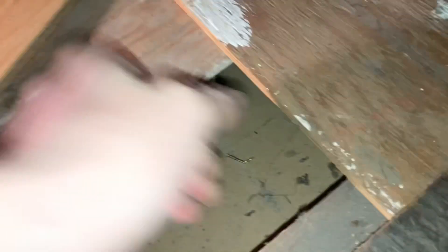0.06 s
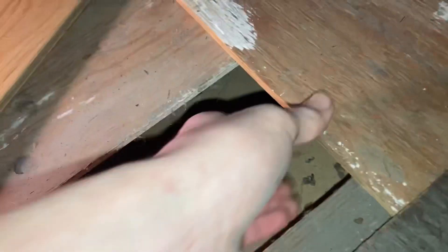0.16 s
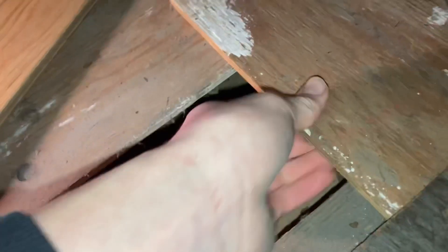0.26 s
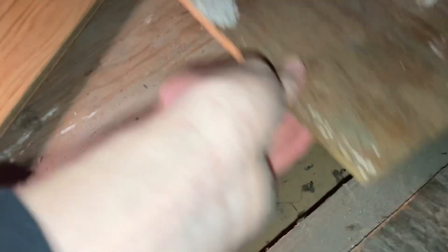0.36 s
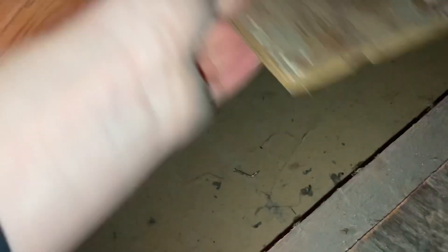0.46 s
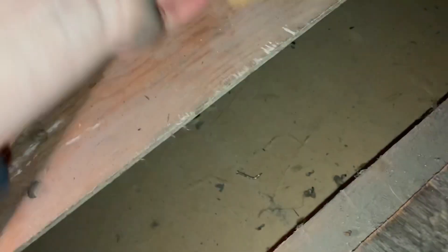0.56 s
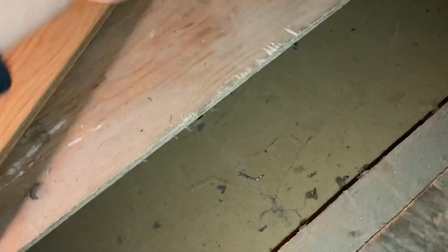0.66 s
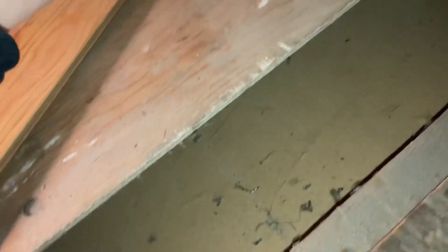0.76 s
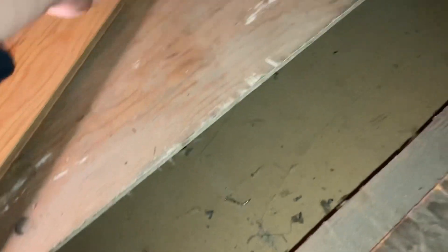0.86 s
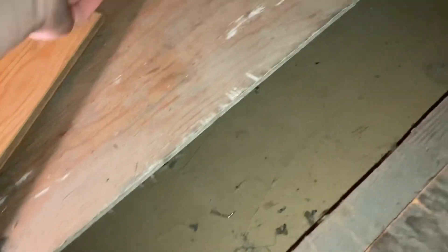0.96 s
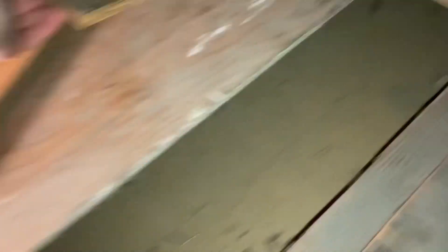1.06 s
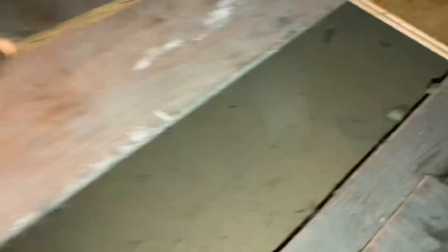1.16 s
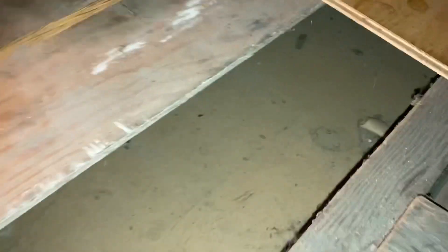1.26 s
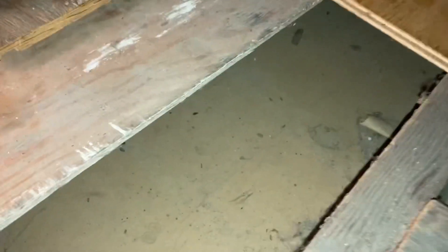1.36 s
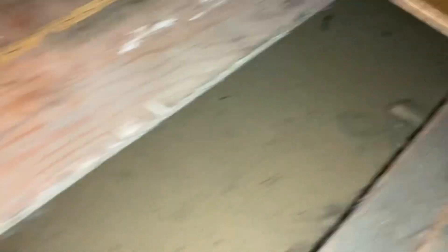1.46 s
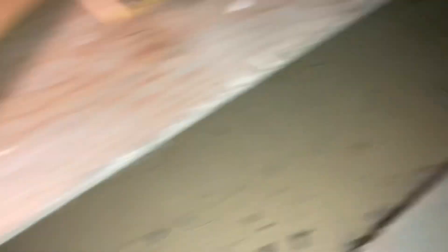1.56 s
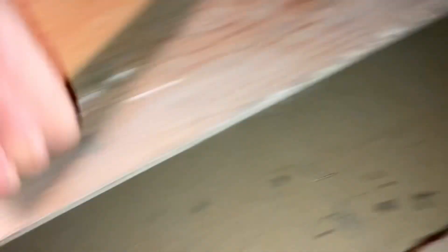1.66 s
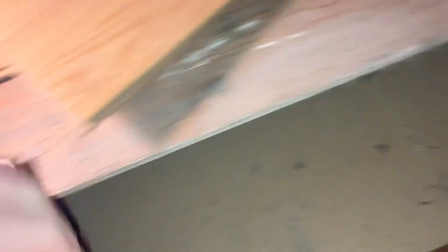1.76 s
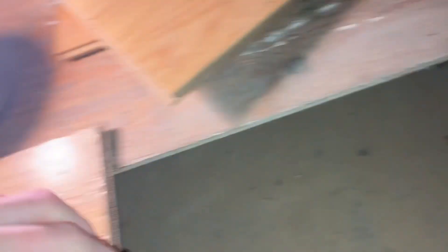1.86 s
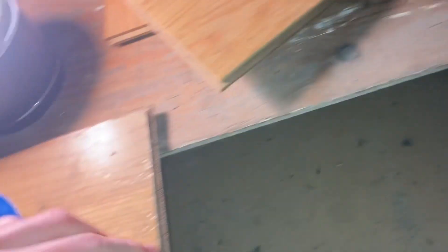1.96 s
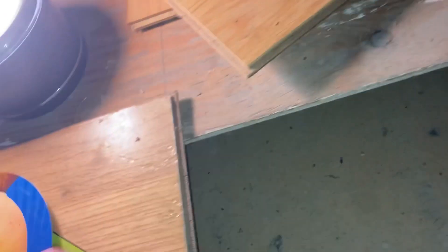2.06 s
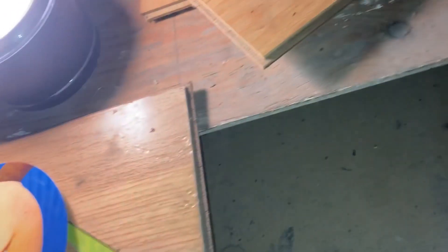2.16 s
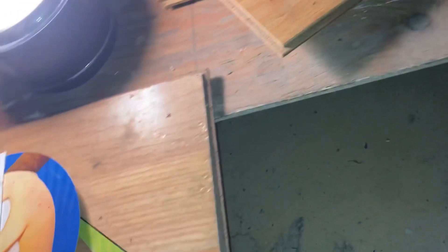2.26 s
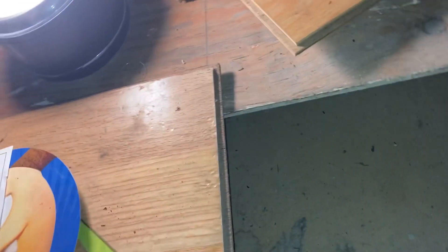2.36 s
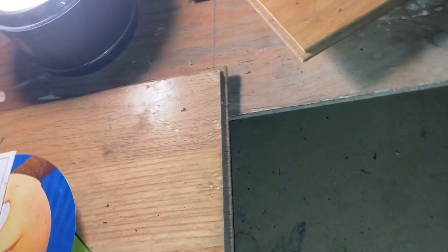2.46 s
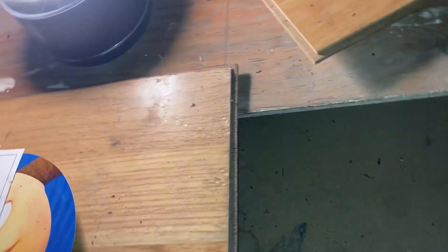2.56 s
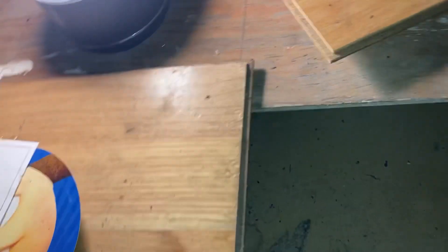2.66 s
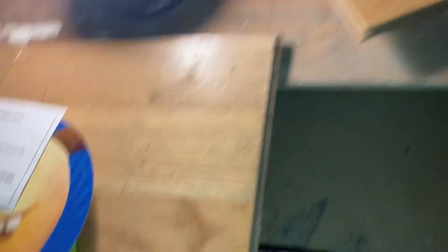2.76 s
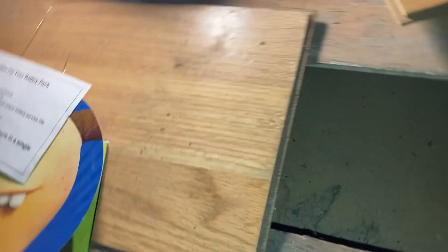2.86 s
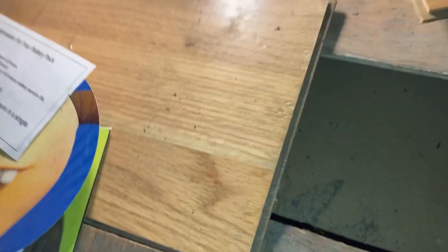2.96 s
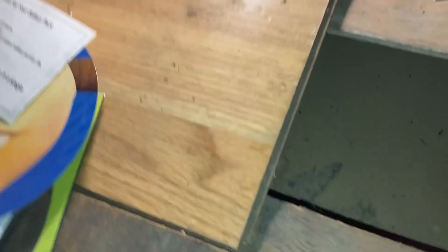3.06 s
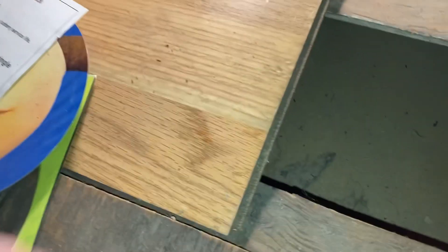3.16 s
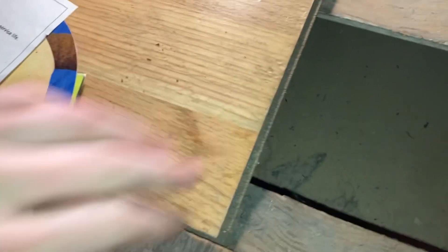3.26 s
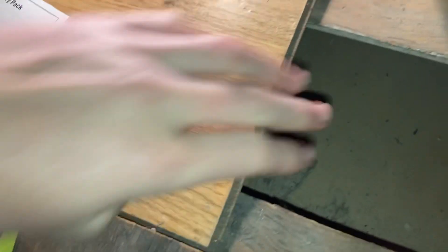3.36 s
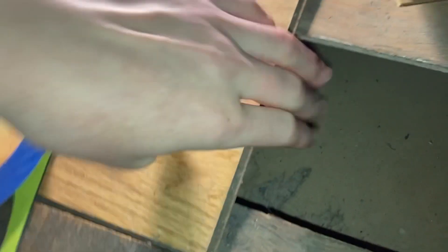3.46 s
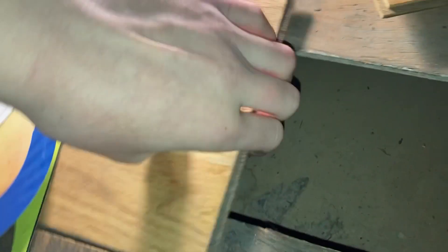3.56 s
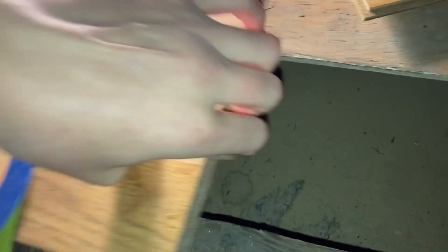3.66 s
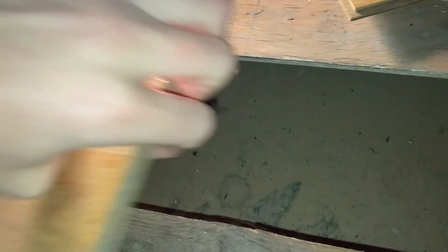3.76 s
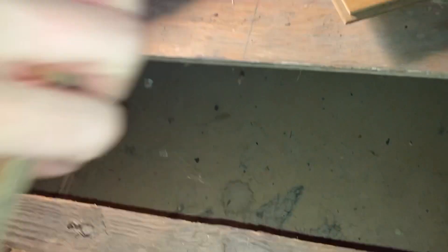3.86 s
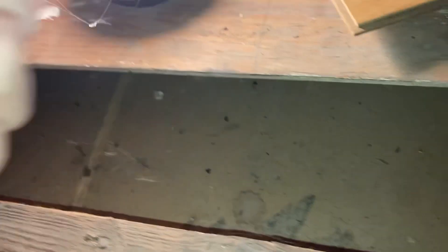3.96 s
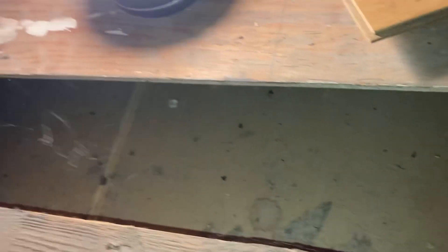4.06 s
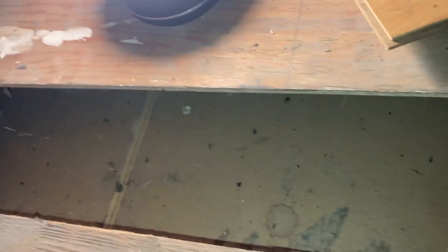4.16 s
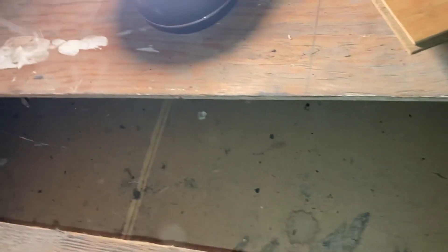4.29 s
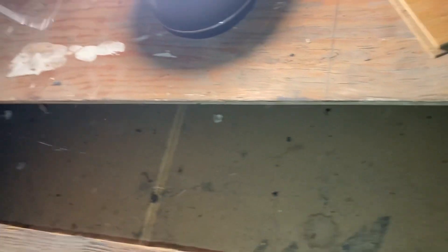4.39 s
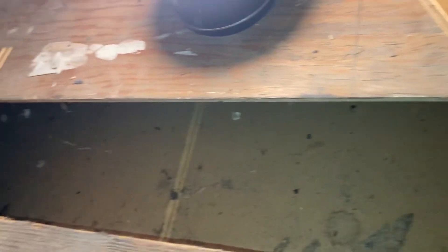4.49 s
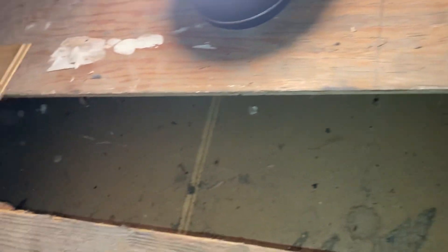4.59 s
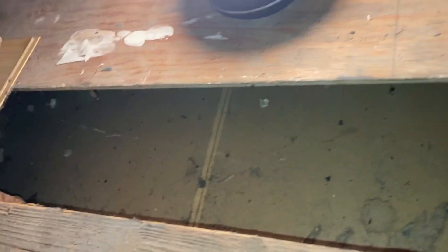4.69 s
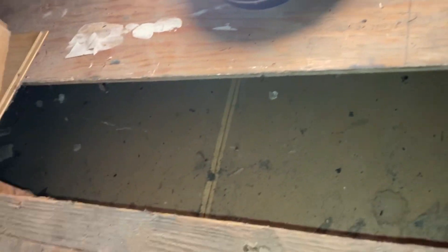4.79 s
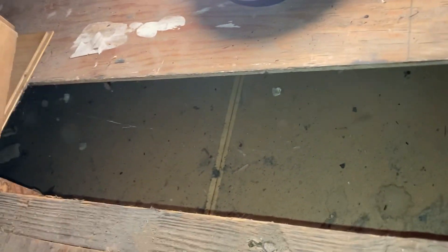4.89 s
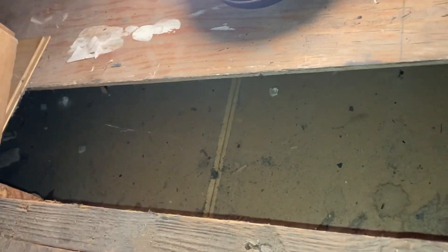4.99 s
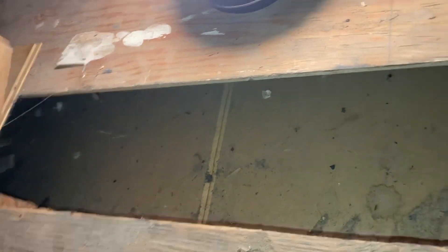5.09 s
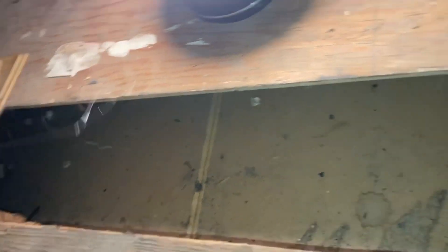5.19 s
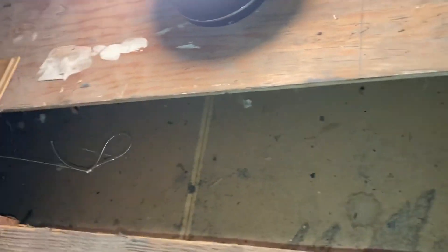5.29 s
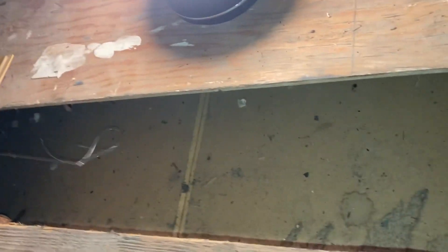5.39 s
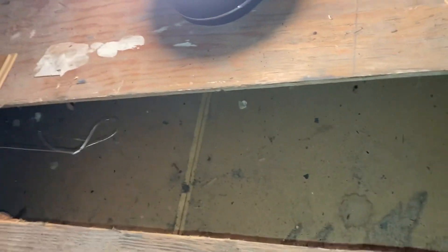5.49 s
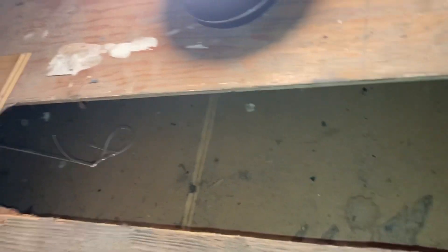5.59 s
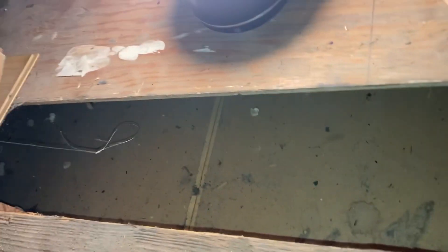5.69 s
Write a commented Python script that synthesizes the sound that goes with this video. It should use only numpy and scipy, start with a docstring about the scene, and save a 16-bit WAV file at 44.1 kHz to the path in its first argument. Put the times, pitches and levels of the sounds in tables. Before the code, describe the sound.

Wood on wood, very near the microphone: light thumps and a brief rub, one hard clack just before a second, a bouncing clatter soon after. Next a board grates over dusty timber in two rough strokes, with ticks and crackles of grit and a dull knock between them. The small wooden space adds short reflections over quiet air noise.

```python
"""Loose boards dragged and dropped in an attic

Plywood boards on joists are nudged and dragged, and one drops twice with bounces. A palm thumps them.
Blows are sums of fading tones; rubbing is dense random clicks sent through resonances, with hissing dust.
Grit catches as short noise bursts, edges squeal in narrow resonances, and the floor booms as low noise.
Faint hum and air noise run throughout, and short reflections off the rafters surround the boards.
"""
import sys
import numpy as np
from scipy import signal
from scipy.fft import rfft, irfft
from scipy.io import wavfile
from scipy.ndimage import uniform_filter1d, map_coordinates

SR = 44100
rng = np.random.default_rng(int(sys.argv[2]) if len(sys.argv) > 2 else 0)


def put_to_file(sound):
    """Save the sound as 16-bit audio at rate SR, in the file named by the first command-line argument."""
    columns = np.atleast_2d(sound).T  # one column per channel
    safe = np.clip(columns, -1, 1)
    whole_steps = np.round(safe * 32767)
    wavfile.write(sys.argv[1], SR, whole_steps.astype(np.int16))


N = 252693


def from_db(db):
    """Turns decibels into a plain multiplier."""
    return 10 ** (np.asarray(db) / 20)


def rms_one(x):
    """Scales a sound to an average (rms) strength of 1."""
    return x / np.sqrt(np.mean(x ** 2) + 1e-20)


def butter(x, hz, kind, order=2):
    """Keeps only the low, high or middle band of a sound."""
    return signal.sosfilt(signal.butter(order, hz, kind, fs=SR, output="sos"), x)


def at_hz(points, hz):
    """Reads a curve of (pitch, value) points, with pitch on a logarithmic scale."""
    point_hz, values = np.array(points).T
    return np.interp(np.log(hz), np.log(point_hz), values)


def coloured(x, spectrum):
    """Shapes a steady sound by a curve of (frequency [Hz], level [dB])."""
    hz = np.maximum(np.fft.rfftfreq(N, 1 / SR), 1)
    return irfft(rfft(x) * from_db(at_hz(spectrum, hz)), N)


def delayed(x, lag_s):
    """Delays a sound, even by part of a sample, by turning the phase of each frequency."""
    hz = np.fft.rfftfreq(N, 1 / SR)
    return irfft(rfft(x) * np.exp(-2j * np.pi * hz * lag_s), N)


def lumps(per_s):
    """Slow random ups and downs with rms 1, no faster than about per_s [Hz]."""
    return rms_one(butter(rng.standard_normal(N), per_s, "low"))


def resonances(x, peaks, patchy_db=0):
    """Side-by-side resonances with alternating signs, which can swell and fade one by one; rms 1."""
    out = 0
    for k, (hz, width, level_db) in enumerate(peaks):
        r = np.exp(-np.pi * width / SR)
        feedback = [1, -2 * r * np.cos(2 * np.pi * hz / SR), r * r]
        ringing = signal.lfilter([(1 - r * r) / 2, 0, (r * r - 1) / 2], feedback, x)
        # the contact moves, so each resonance comes and goes
        swell_db = patchy_db * lumps(30) if patchy_db else 0
        out = out + (-1) ** k * from_db(level_db + swell_db) * ringing
    return rms_one(out)


def grit(per_s, spread_db):
    """Random tiny collisions, per_s of them a second on average; spread_db makes them uneven; rms 1."""
    sizes = from_db(spread_db * np.minimum(rng.exponential(1, N), 4))
    signs = rng.choice([-1, 1], N)
    hits = rng.random(N) < per_s / SR
    return rms_one(sizes * signs * hits)


def add(out, x, s):
    """Mixes a short sound into a longer one, starting at s seconds."""
    at = round(s * SR)
    out[..., at:at + x.shape[-1]] += x[..., :N - at]


def dying(events, rise_s, t60):
    """Volume curve that swells at each event (time [s], level [dB]) and falls 60 dB in t60 seconds."""
    t = np.arange(N) / SR
    power = 0
    for s, level_db in events:
        after = np.maximum(t - s, 0)
        power = power + (from_db(level_db - 60 * after / t60) * (1 - np.exp(-after / rise_s))) ** 2
    return np.sqrt(power)


def air():
    """Steady low hum, the same on both sides, and a hush of noise that is more alike in the bass."""
    # colour of the hush: (frequency [Hz], relative level [dB per Hz])
    hush_colour = [(41, -6), (70, 5.5), (155, -1.5), (393, -13.5), (632, -9.5), (1290, -9.5), (1880, -16),
                   (2740, -22.5), (4330, -32), (5380, -72), (8000, -107), (10400, -80), (17600, -120)]
    # how alike left and right are: (frequency [Hz], likeness [0 to 1])
    likeness = [(30, 0.21), (130, 0.69), (300, 0.83), (700, 0.66), (1500, 0.2), (4000, 0.037)]
    # hum resonance: (frequency [Hz], width [Hz], relative level [dB])
    hum_peak = [(48.8, 2.55, 0)]
    hum_db, hush_db = -45, -50.5
    mid, side = rng.standard_normal((2, N))
    # the shared part is strong where the sides are alike, the opposed part where they differ
    side = coloured(side, [(hz, 10 * np.log10(1 - c)) for hz, c in likeness])
    mid = coloured(mid, [(hz, 10 * np.log10(1 + c)) for hz, c in likeness])
    hum = from_db(hum_db) * resonances(rng.standard_normal(N), hum_peak)
    hush = rms_one(np.array([coloured(mid + side, hush_colour), coloured(mid - side, hush_colour)]))
    return hum + from_db(hush_db) * hush


def stroke_levels():
    """Loudness of rubbing and of dust over time, in dB: the louder stroke wins where strokes meet."""
    # strokes of wood over wood, one curve each: (time [s], rubbing level [dB], dust hiss level [dB])
    strokes = [
        [(0.0, -81, -62), (0.1, -56.5, -68), (0.245, -54, -65), (0.258, -45.5, -51), (0.27, -57, -52),
         (0.32, -50, -64), (0.34, -48, -43), (0.36, -41, -39), (0.385, -39.5, -42), (0.43, -63, -76),
         (0.55, -90, -99), (0.8, -57, -77)],
        [(0.9, -86, -86), (0.94, -54, -56), (1.01, -70, -80), (1.05, -59, -72), (1.15, -49.5, -52.5),
         (1.24, -52, -51), (1.275, -36, -69)],
        [(1.47, -56.5, -73), (1.56, -55.5, -62), (1.68, -53.5, -55), (1.88, -61.5, -83)],
        [(1.96, -52.5, -81), (2.03, -78, -49), (2.1, -70, -48.5), (2.17, -56, -42), (2.22, -50, -39.5),
         (2.35, -48, -44), (2.41, -51, -36.5), (2.65, -44.5, -35.5), (2.81, -36, -30.5), (2.87, -35.5, -38),
         (2.895, -36, -37), (2.92, -41.5, -40), (2.96, -49, -49), (2.99, -57, -53)],
        [(2.99, -47, -48), (3.015, -46, -45), (3.03, -41, -37), (3.06, -38.5, -39.5), (3.13, -38.5, -56),
         (3.21, -51.5, -64), (3.38, -51, -69), (3.5, -53, -67)],
        [(3.51, -55, -59), (3.56, -41, -53), (3.6, -50.5, -53.5), (3.77, -42.5, -41.5), (3.89, -40.5, -40),
         (4.01, -38, -37.5), (4.045, -32, -37), (4.07, -36, -36), (4.1, -40, -41), (4.18, -41, -45),
         (4.28, -39, -34), (4.32, -40, -42), (4.47, -37.5, -39.5), (4.6, -37, -36.5), (4.64, -50.5, -55),
         (4.72, -51, -59)],
        [(4.73, -57, -61), (4.76, -51.5, -51), (4.84, -55, -79), (4.93, -53.5, -63), (4.96, -52.5, -85),
         (5.02, -50.5, -51), (5.12, -55.5, -77), (5.36, -51.5, -62.5), (5.49, -54, -75), (5.73, -53, -66)],
    ]
    t, silent_db = np.arange(N) / SR, -120
    rub_curves, hiss_curves = [], []
    for rows in strokes:
        times, rub, hiss = np.transpose(rows)
        rub_curves.append(np.interp(t, times, rub, silent_db, silent_db))
        hiss_curves.append(np.interp(t, times, hiss, silent_db, silent_db))
    return np.max(rub_curves, axis=0), np.max(hiss_curves, axis=0)


def floor_boom(rub_db):
    """Weight landing on the joists, and rubbing above them, set off low resonances of the floor."""
    # joists and floor: (frequency [Hz], width [Hz], relative level [dB])
    floor_peaks = [(58.2, 16.2, 3), (82.3, 22.4, 0.5), (116.7, 21.7, -7)]
    # weight landing on the floor: (time [s], level [dB])
    loads = [(0.0, -27), (0.265, -23.5), (0.37, -27), (0.825, -13), (0.87, -40), (0.94, -32), (1.02, -27.5),
             (1.1, -31), (1.2, -35), (1.29, -16), (1.51, -30.5), (3.11, -38), (3.54, -28), (3.6, -28.5),
             (4.09, -49), (4.26, -37), (4.58, -43), (4.75, -46), (4.92, -43), (5.1, -52)]
    swing = butter(resonances(rng.standard_normal(N), floor_peaks), 56, "high", order=3)
    # under a stroke, the boom's drive is 11 dB below the rubbing
    boom = dying(loads, rise_s=0.0025, t60=0.45) + from_db(rub_db - 11)
    # the joists swing evenly once they are loaded
    swing_size = np.sqrt(uniform_filter1d(swing ** 2, size=SR // 25) + 0.076)
    return boom * swing / swing_size


def rubbed_wood(rub_db, uneven):
    """Dense grit excites the dragged board's body and a scratchy rasp; drops rattle on the joists."""
    # dragged board's body: (frequency [Hz], width [Hz], relative level [dB])
    body_peaks = [(173, 37, 3.5), (308, 131, 3.5), (486, 490, -15.5), (638, 193, 3.5), (1340, 410, -1)]
    # scratchy rasp: (frequency [Hz], width [Hz], relative level [dB])
    rasp_peaks = [(1230, 570, -4), (2020, 490, 0), (2530, 1200, -2.5), (3100, 530, -2), (3630, 730, -7),
                  (4470, 480, 0), (5220, 640, -8.5)]
    # a dropped board rattles on the joists: (time [s], level [dB])
    rattle_events = [(0.822, -28), (0.858, -20.5), (1.277, -15), (1.292, -18), (1.319, -15), (1.35, -33.5)]
    patchy_db = 1.5
    faint_db, faint_dull_hz = -50, 2700   # rubbing below this level loses its edge
    rattle = dying(rattle_events, rise_s=0.00096, t60=0.093)
    # the body is at -42.5 dB when the rubbing is at -41 dB, and follows nearly all of its swing
    body = from_db(-42.5 + 0.98 * (rub_db + 41)) * uneven ** 0.67 + rattle
    rasp = from_db(rub_db) * uneven
    clatter = from_db(-1.0) * rattle ** 2 / rattle.max()   # squared, so it fades faster than the rattle
    edge = 1 / (1 + from_db(faint_db - rub_db))
    grating = resonances(grit(9000, spread_db=1.8), rasp_peaks, patchy_db)
    dull = butter(grating, faint_dull_hz, "low")
    body_sound = body * resonances(grit(4000, spread_db=1.0), body_peaks, patchy_db)
    rasp_sound = rasp * (dull + edge * (grating - dull))
    return body_sound + rasp_sound + clatter * dull


def dust_hiss(hiss_db, uneven):
    """Dust under the board hisses: equal tiny collisions, shaped by a steady colour."""
    # colour of the hiss: (frequency [Hz], relative level [dB per Hz])
    hiss_colour = [(4000, -5.5), (6000, -8), (8000, -3), (11000, -4.5), (13500, -4.5), (15500, -14),
                   (15950, 10), (16250, -29)]
    hiss = rms_one(coloured(grit(8000, spread_db=0.0), hiss_colour))
    return from_db(hiss_db) * uneven ** 0.56 * hiss


def drag():
    """Wood, dust and floor all follow the same strokes; the grain makes the wood and dust uneven."""
    rub_db, hiss_db = stroke_levels()
    uneven = from_db(1.8 * lumps(25))
    return rubbed_wood(rub_db, uneven), dust_hiss(hiss_db, uneven), floor_boom(rub_db)


def knocks():
    """A short chatter of contact sets the board ringing; hard blows favour high modes, a crack tops them."""
    # blows on the boards: (time [s], level [dB], hardness: tilt above 250 Hz [dB per octave],
    # thud: boost of modes below 220 Hz [dB], share of the free ringing time [0 to 1])
    blow_rows = [(0.108, -41, -8, 2, 0.48), (0.268, -19.5, -6, 5, 0.22), (0.283, -20.5, -9, 1, 0.32),
                 (0.318, -25, -14, 15, 0.47), (0.351, -28, 5.5, 22, 1), (0.378, -25.5, -24, -3, 0.41),
                 (0.433, -38, -26, 0, 0.39), (0.618, -42.5, 2.5, -23, 0.16), (0.824, 1.5, 7.5, -1, 0.19),
                 (0.838, -6, -0.5, 4, 0.47), (0.8572, -2, -2, -6, 0.39), (0.899, -18.5, 1, -11, 0.35),
                 (0.911, -17, -7, 6, 0.93), (0.959, -19.5, -13, 5.5, 0.96), (1.006, -24, -9, 10, 0.78),
                 (1.115, -29.5, -40, 1, 0.92), (1.277, -13, 2, -13, 0.22), (1.281, -8.5, 4.5, -5, 0.28),
                 (1.285, -7.5, 3, -14, 0.21), (1.29, -4.5, 3.5, -15, 0.48), (1.295, -2.5, -9, -6, 0.33),
                 (1.305, -14, 8, -14, 0.26), (1.311, -16.5, 8, -8, 0.27), (1.32, -8.5, 2, -20, 0.19),
                 (1.327, -8.5, 2, -6, 0.22), (1.335, -11, -9, -12, 0.21), (1.343, -15, 2, -26, 0.59),
                 (1.354, -12, -6.5, -21, 0.53), (1.366, -16, -10, -6, 0.39), (1.375, -22.5, 0.5, -12, 0.62),
                 (1.389, -20.5, -5, -4, 0.56), (1.414, -23, -14.5, 4, 0.6), (1.503, -33, -20, 9, 0.21),
                 (2.878, -34, 0, 11, 0.2), (3.032, -25, -3.5, -1, 0.18), (3.083, -25, -3.5, -10, 0.21),
                 (3.498, -35.5, -6, 12, 0.3), (3.538, -28, -2, -8, 0.31), (3.541, -19.5, -7.5, 0, 0.17),
                 (3.549, -27.5, -4.5, -2, 0.33), (3.557, -24.5, -21, -17, 0.29), (3.573, -29, 6, 28, 0.34),
                 (3.584, -46, 3, -2, 0.18), (3.611, -43, -5, 12, 0.67), (3.914, -23, -5.5, -8.5, 0.7),
                 (3.954, -26, 10, 4, 0.19), (4.226, -24, -15, -6, 0.14), (4.238, -29, -13, 28, 0.59),
                 (4.248, -39, 1, 2, 0.46), (4.262, -45, -9, 17, 0.85), (4.285, -43, -16, 22, 0.71),
                 (4.877, -41.5, -14, 5, 0.74), (4.979, -25.5, -2, -6.5, 0.22)]
    # ringing modes of a board: (frequency [Hz], relative level [dB], time to fall 60 dB when free [s])
    board_modes = [(116.8, -7.5, 0.86), (154.7, -4.5, 0.54), (202, -6.5, 0.27), (245.1, -4, 0.48),
                   (307.5, 3.5, 0.33), (349, 0.5, 0.25), (391, -1, 0.3), (420.3, -7.5, 0.54),
                   (488, -8, 0.44), (568, 9.5, 0.089), (610, -2.5, 0.24), (687.5, 1.5, 0.31),
                   (827.6, 9, 0.11), (954, 3, 0.095), (1066, 8, 0.14), (1132, -0.5, 0.21),
                   (1410, 5.5, 0.031), (1284, 0, 0.12), (1497, -3, 0.092), (1635, 0.5, 0.14),
                   (1843, 1.5, 0.064), (2065, 4, 0.094), (2340, 0, 0.1), (2760, -1.5, 0.056),
                   (2940, -6.5, 0.071), (3510, -9, 0.068), (3790, -13, 0.033), (4150, -20, 0.15)]
    mode_shift = 0.03   # spread of a mode's pitch from blow to blow, as a fraction
    contact_s = 0.0021   # time for the chatter of a hard blow to fall 60 dB
    lag_s, pan_db = 0.00014, 2.5   # right side later; left side louder
    out, t = np.zeros((2, N)), np.arange(SR // 3) / SR
    # three copies of each mode, so that it can split
    hz, level_db, t60 = np.repeat(np.transpose(board_modes), 3, axis=1)[:, :, None]
    for s, blow_db, hard_db, thud_db, ring in blow_rows:
        softness_db = min(hard_db, 0)
        # a loose board rests differently at every blow: its modes split and shift
        shifted = hz * (1 + mode_shift * rng.standard_normal(hz.shape))
        weight_db = level_db + hard_db * np.log2(np.maximum(hz / 250, 1)) + thud_db * (hz < 220)
        strengths = from_db(weight_db + 2.5 * rng.standard_normal(hz.shape))
        strengths = strengths * rng.choice([-1, 1], hz.shape)
        fade = from_db(-60 * t / (t60 * max(ring, .05)))
        modes = (strengths * np.sin(2 * np.pi * shifted * t) * fade).sum(axis=0)
        # the chatter of a dull blow dies sooner
        chatter_s = contact_s * 2 ** (0.03 * softness_db)
        chatter = np.abs(rng.standard_normal(SR // 100)) * from_db(-60 * t[:SR // 100] / chatter_s)
        push = np.diff(chatter, prepend=0) + 0.29 * chatter
        blow = signal.fftconvolve(modes, push)[:len(t)]
        # the crack follows only part of the blow's level
        crack_db = -48 + 0.32 * blow_db + softness_db
        crack = butter(rng.standard_normal(len(t)), [3000, 5200], "band")
        crack = crack * from_db(crack_db - 60 * t / 0.013)
        blow = from_db(blow_db) * blow / np.abs(blow).max() + crack
        add(out[0], blow, s)
        add(out[1], blow, s + lag_s * rng.uniform(0, 1.76))   # each blow lands at another spot
    return out * from_db([[pan_db / 2], [-pan_db / 2]])


def thumps():
    """A soft push of a palm on a held board sets two close low modes ringing."""
    # thumps: (time [s], level [dB], lower mode's frequency [Hz], time to fall 60 dB [s])
    thump_rows = [(0.13, -28, 272, 0.071), (0.267, -11.5, 234, 0.081), (0.347, -19.5, 201, 0.06),
                  (3.542, -19, 249, 0.13), (4.215, -24.5, 239.6, 0.15)]
    out, t = np.zeros(N), np.arange(SR // 4) / SR
    for s, level_db, hz, t60 in thump_rows:
        pair = np.sin(2 * np.pi * hz * t) + 0.5 * np.sin(2 * np.pi * 1.24 * hz * t)
        swell = 1 - np.exp(-t / 0.0014)
        add(out, from_db(level_db - 60 * t / t60) * swell * pair, s)
    return out


def squeak():
    """An edge squeals as it slips: fast random slips ring narrow resonances, each for a short while."""
    # squeals: (start [s], end [s], frequency [Hz], width [Hz], level [dB])
    squeal_rows = [(0.257, 0.292, 3030, 90, -50), (0.33, 0.395, 1800, 90, -39),
                   (0.345, 0.395, 3550, 150, -45), (0.824, 0.834, 3800, 350, -29),
                   (0.936, 0.96, 4000, 300, -53), (1.175, 1.27, 790, 70, -45), (1.2, 1.27, 1860, 100, -51),
                   (1.185, 1.26, 2180, 250, -50), (1.2, 1.26, 3000, 120, -53), (1.19, 1.26, 4450, 250, -57)]
    edge_s = 0.006   # sets how gently a squeal starts and stops
    t, slips, out = np.arange(N) / SR, grit(3000, spread_db=1.5), 0
    for start, end, hz, width, level_db in squeal_rows:
        gate = np.interp(t, [start - edge_s / 2, start, end - edge_s, end + edge_s], [0, 1, 1, 0])
        # two resonances in a row, the first twice as wide
        ringing = resonances(slips, [(hz, 2 * width, 0)])
        ringing = resonances(ringing, [(hz, width, 0)])
        out = out + from_db(level_db) * gate * ringing
    return out


def catches():
    """Grit catches under a board: noise around one pitch over a wide crunch, with a sharp bright spit."""
    # catches: (time [s], burst level [dB], centre frequency [Hz], spit level [dB])
    catch_rows = [(0.271, -49, 1830, -50), (0.345, -39, 1900, -51), (0.35, -32, 2190, -45),
                  (0.391, -32.5, 900, -46), (0.826, -28, 3830, -49), (0.858, -34, 4730, -22),
                  (0.925, -54, 4030, -46), (0.951, -45, 4500, -55), (1.278, -30.5, 3970, -26),
                  (1.291, -33, 4100, -40), (1.323, -40, 4200, -50), (1.412, -49, 4380, -49),
                  (2.201, -29.5, 1410, -31), (2.217, -31.5, 1470, -36), (2.2296, -49, 5000, -17),
                  (2.243, -37, 1190, -33), (2.397, -30, 1380, -29), (2.442, -31.5, 1410, -26),
                  (2.714, -27.5, 735, -20.5), (2.762, -31, 730, -30), (2.787, -41, 2500, -22),
                  (2.835, -24, 2300, -20), (2.857, -16, 710, -40), (2.865, -19.5, 1660, -41),
                  (2.858, -29, 3860, -40), (2.869, -27, 4000, -40), (2.873, -26, 2230, -45),
                  (2.901, -26.5, 730, -31), (2.902, -26, 4380, -38), (2.932, -29.5, 665, -56),
                  (3.026, -28, 4330, -48), (3.111, -19.5, 2600, -47), (3.114, -26.5, 1930, -52),
                  (3.121, -26.5, 2590, -52), (3.123, -24.5, 697, -52), (3.132, -30, 2280, -52),
                  (3.143, -33, 1900, -55), (3.375, -39.5, 2120, -42), (3.53, -40, 840, -33),
                  (3.556, -37, 4630, -17.5), (3.695, -33, 795, -20.5), (3.695, -27.5, 2700, -48),
                  (3.792, -21.5, 776, -27), (3.794, -27, 3570, -42), (3.821, -29, 2600, -49),
                  (3.922, -22.5, 2850, -30), (3.961, -23.5, 796, -26), (3.967, -26, 3070, -35),
                  (3.998, -27, 2340, -31), (4.032, -17.5, 2670, -41), (4.042, -12, 4370, -16),
                  (4.058, -18, 2620, -21), (4.119, -33, 2920, -20.5), (4.239, -29, 4370, -45),
                  (4.381, -22.5, 3550, -27), (4.412, -27, 5050, -45), (4.435, -29, 2050, -42),
                  (4.476, -32, 3510, -45), (4.49, -40, 750, -28), (4.544, -30, 4460, -40),
                  (4.556, -28, 3040, -18), (4.583, -23.5, 4440, -18), (4.74, -42, 3970, -41),
                  (4.768, -34.5, 1270, -43), (4.809, -41.5, 1550, -48), (4.63, -36, 3570, -28.5),
                  (4.927, -44.5, 3740, -36.5), (4.972, -58, 5000, -45), (5.008, -57, 1420, -37),
                  (5.024, -38, 720, -32), (5.246, -47, 2930, -52), (5.28, -49, 4470, -45),
                  (5.314, -48, 4000, -59), (5.342, -36, 1130, -36.5), (5.607, -44.5, 690, -71),
                  (5.662, -41.5, 1220, -48)]
    catch_s, spit_s, rise_s = 0.0065, 0.0025, 0.0012   # the first two: time to fall 20 dB
    crunch_db = 7   # gain of the crunch noise
    out, t = np.zeros(N), np.arange(SR // 8) / SR
    for s, burst_db, centre_hz, spit_db in catch_rows:
        tone, crunch, spit = rng.standard_normal((3, len(t)))
        fade = from_db(-20 * t / catch_s) * (1 - np.exp(-t / rise_s))
        # played backwards, so that the band is already sounding at the start
        tone = butter(tone, [centre_hz / 1.16, centre_hz * 1.1], "band")[::-1] * fade
        crunch = from_db(crunch_db) * butter(crunch * fade, [600, 5000], "band")
        burst = 0.77 * tone / np.abs(tone).max() + crunch
        spit = butter(spit * from_db(-20 * t / spit_s), 6700, "high")
        add(out, from_db(burst_db) * burst + from_db(spit_db) * spit, s)
    return out


def attic(x):
    """Reflections off rafters and boards: decaying noise, its treble dying first, another tail per side."""
    dull_t60_s, treble_t60_s, dull_hz, level_db = 0.096, 0.034, 2610, -6
    t = np.arange(SR // 2) / SR
    out = []
    for side in x:
        noise = rng.standard_normal(len(t))
        dull = butter(noise, dull_hz, "low", order=1)
        tail = dull * from_db(-60 * t / dull_t60_s) + (noise - dull) * from_db(-60 * t / treble_t60_s)
        # nothing returns in the first 2 ms, and little of the bass does
        tail = butter(tail * (t > .002), 230, "high", order=2)
        out.append(signal.fftconvolve(side, tail / np.sqrt(np.sum(tail ** 2)))[:N])
    return from_db(level_db) * np.array(out)


def scene():
    """Blows, catches and rubbing, their reflections, the booming floor and the attic air, in stereo."""
    wood, dust, floor = drag()
    blows, caught = knocks() + thumps(), catches()
    rubbing = squeak() + wood + dust
    scraping = caught + rubbing
    # the right side hears the scraping later; the lag wanders as the rubbing spot jumps along the board
    lag_s = 0.00034 + 0.00006 * lumps(60)
    later = map_coordinates(scraping, [np.arange(N) - SR * lag_s], order=3)
    near = blows + np.array([scraping, later])
    stirring = blows + caught + 0.79 * rubbing   # what stirs the attic
    return near + attic(stirring) + floor * from_db([[-1], [1]]) + air()


def record(dry):
    """Left treble goes inverted to the right and a little later to the left; loud peaks round off."""
    treble_hz, treble_lag_s = 5330, 0.0002196
    treble = butter(dry[0], treble_hz, "high", order=6)
    right_treble = 0.083 * butter(dry[1], treble_hz, "high", order=6) - treble
    wide = butter(dry, treble_hz, "low", order=6)
    wide = wide + np.array([delayed(treble, treble_lag_s), right_treble])
    wide = butter(wide, 69.6, "high", order=2)   # the microphone drops the deep bass
    rounded = 1.3 * np.tanh(wide / 1.3)
    # steep cut: 70 dB down from 16800 Hz upwards
    return signal.sosfilt(signal.cheby2(12, 70, 16800, fs=SR, output="sos"), rounded)


dry = scene()
out = record(dry)
put_to_file(out)
```